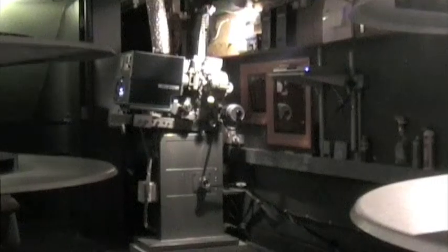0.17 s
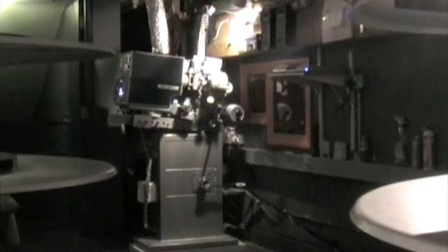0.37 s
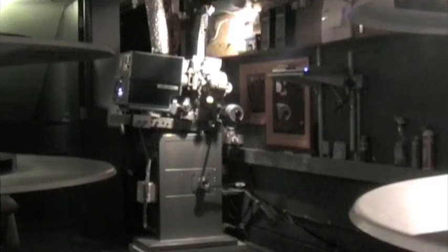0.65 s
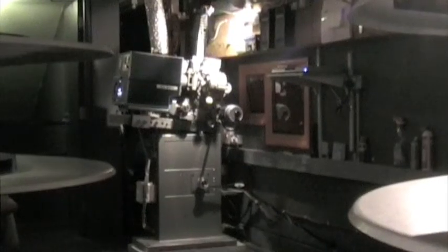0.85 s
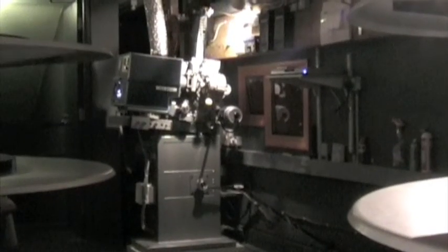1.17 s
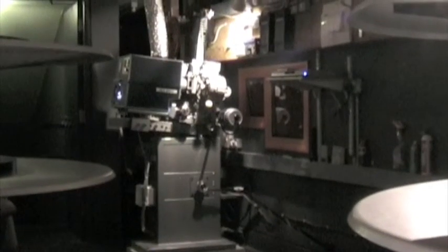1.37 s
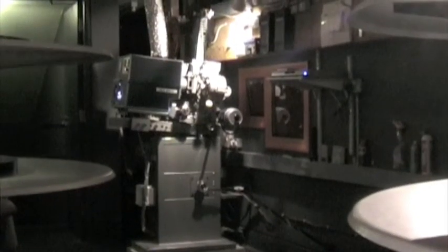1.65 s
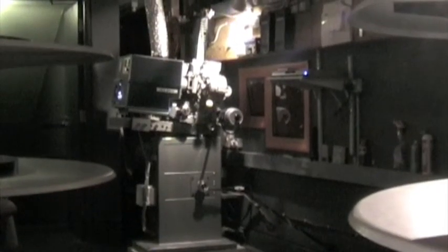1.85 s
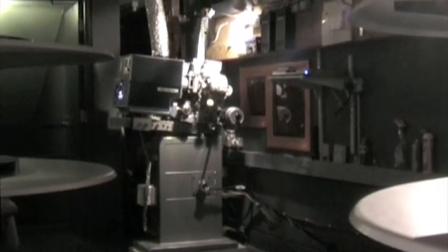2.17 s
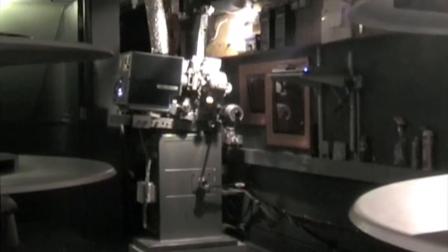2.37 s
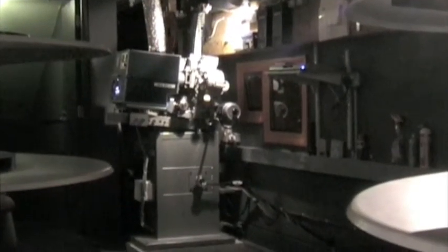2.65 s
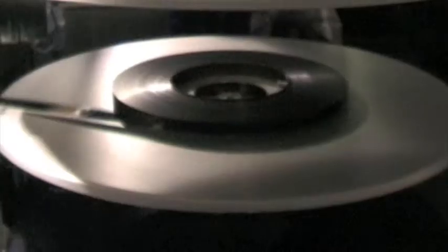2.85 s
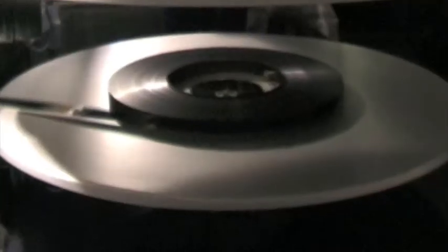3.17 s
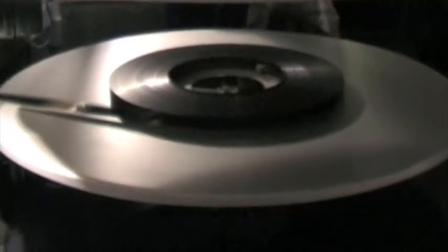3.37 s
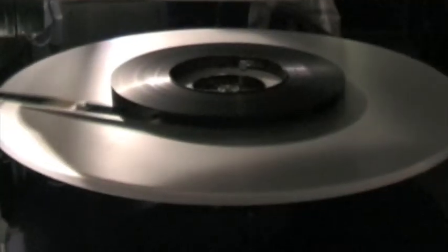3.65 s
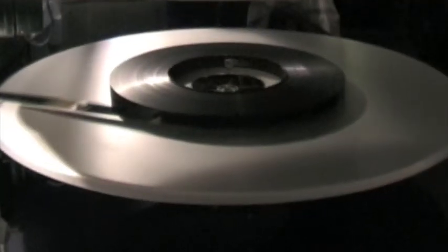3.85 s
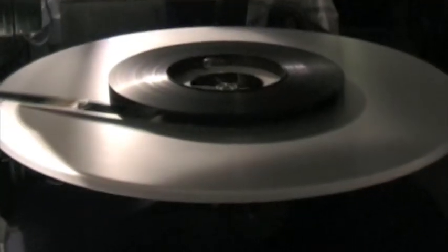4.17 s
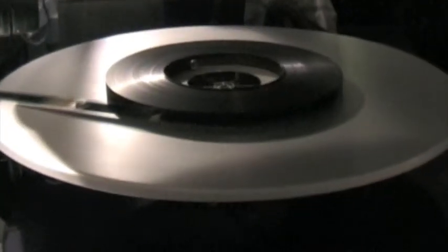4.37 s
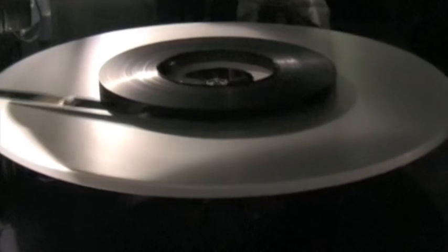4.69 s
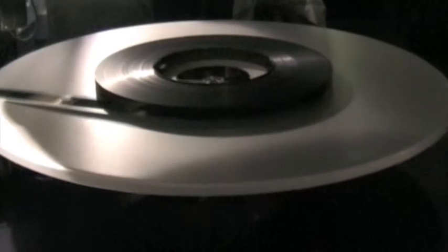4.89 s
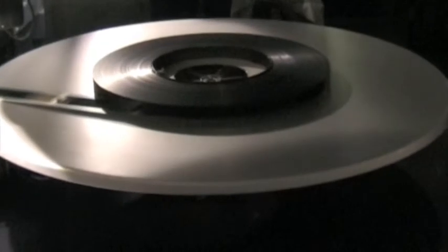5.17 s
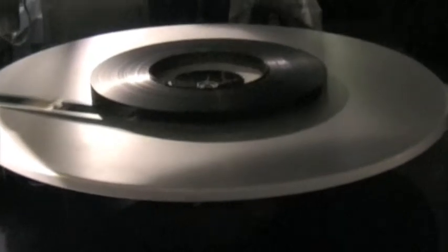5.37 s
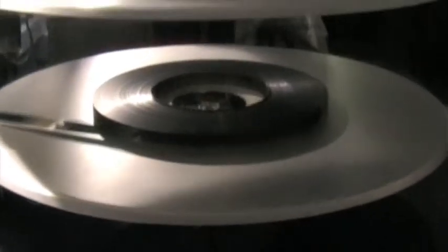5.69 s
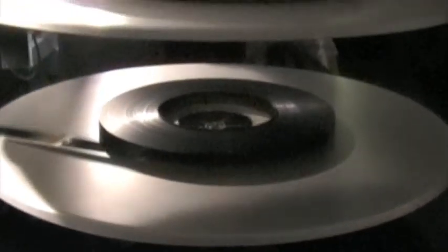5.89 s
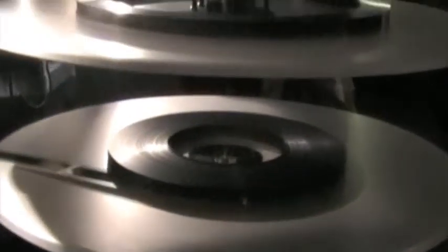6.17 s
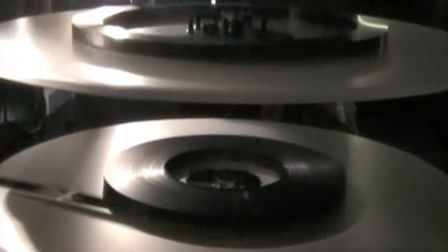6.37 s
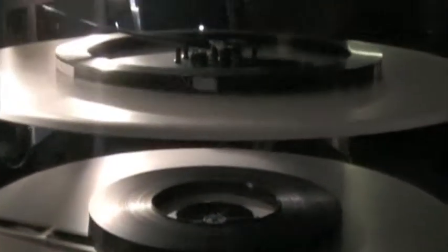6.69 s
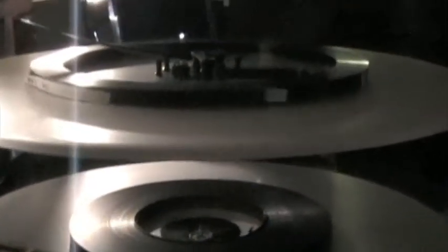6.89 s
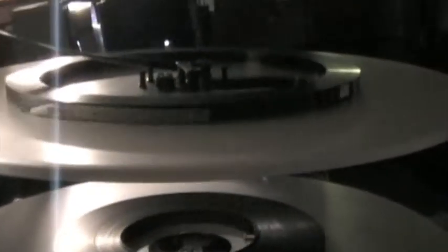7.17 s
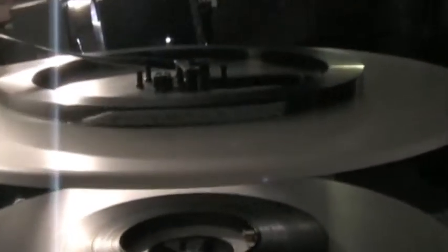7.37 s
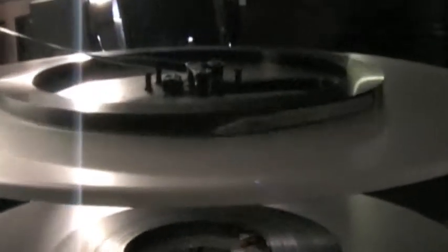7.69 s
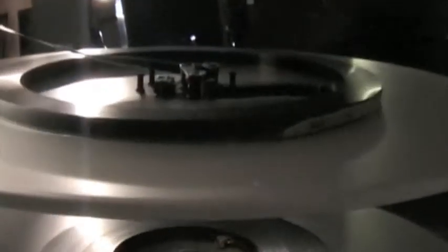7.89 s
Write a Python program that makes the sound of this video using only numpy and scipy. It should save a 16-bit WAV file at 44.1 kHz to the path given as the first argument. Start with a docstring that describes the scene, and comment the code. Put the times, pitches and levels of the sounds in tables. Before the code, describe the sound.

A film projector runs in a small booth, heard from across the room: rapid knocking about twenty-five times a second, blower air, tiny film ticks and a beating motor hum. Near three seconds it dips almost silent for an instant, then returns beside the platters, with more diffuse knocks, sliding-film hiss and thin drive whines. Close stereo microphones.

```python
"""Film projector in a small booth

Heard first across the room and, after a quick dip to near silence, beside the platters. Shaped pulses make
the pull-down's knocks, about 25 a second; coloured noise makes the lamp blower's air and the sliding film,
the perforation ticks and the exhaust duct's drone. Sines make two slowly beating blowers, the mains hum
and the platter drive's passing whines. A hum filter combs the whole sound."""
import sys
import numpy as np
from scipy import signal
from scipy.fft import rfft, irfft, next_fast_len
from scipy.io import wavfile
from scipy.ndimage import uniform_filter1d, map_coordinates

SR = 44100
rng = np.random.default_rng(int(sys.argv[2]) if len(sys.argv) > 2 else 0)


def unload_wav(signal):
    """Save mono or channel-first audio to the path in sys.argv[1] as 16-bit WAV at rate SR, clipped to [-1, 1]."""
    wavfile.write(
        sys.argv[1],
        SR,
        np.round(np.clip(np.atleast_2d(signal).T, -1, 1) * 32767).astype(np.int16),
    )


N = 354123
T = np.arange(N) / SR  # s
SIZE = next_fast_len(N + SR // 2, True)  # room for filter tails
HZ = np.maximum(np.arange(SIZE // 2 + 1) * SR / SIZE, 1)

FRAME_HZ = 24.668
MOVE_S = 2.848  # middle of the fade between the two listening places
SHAFT_HZ, MAINS_HZ = 280.07, 50
SLIP_HZ = 0.4337  # the second blower turns this much slower than the first, so their tones beat

# knocks within one frame (film stops, loop snaps, pin leaves the cross, pin enters it):
# position/share of the frame, level/dB
FRAME_KNOCKS = [(0.01, -0.5), (0.19, -4), (.35, -6), (.88, -3.5)]


def undb(db):
    """Decibels to gain."""
    return 10 ** (np.asarray(db) / 20)


def over_hz(table):
    """Columns of a table, joined by straight lines over log frequency."""
    hz, *columns = np.transpose(table)
    return [np.interp(np.log(HZ), np.log(hz), column) for column in columns]


def shape(x, gain):
    """Filter by a gain for each frequency."""
    return irfft(rfft(x, SIZE) * gain, SIZE)[..., :N]


def resonance(hz, width_hz):
    """Gain of a resonant peak: 1 at its centre, one half at the edges of its width."""
    return 1 / (1 + ((HZ - hz) / width_hz * 2) ** 2)


def colour(x, table):
    """Give a white signal a spectrum in dB per Hz, falling away steeply beyond its ends."""
    lowest, highest = table[0][0], table[-1][0]
    top_rolloff = 1 + (HZ / highest / 1.04) ** 20
    bottom_rolloff = 1 + (lowest / HZ / 2) ** 10
    ends = 1 / np.sqrt(top_rolloff * bottom_rolloff)
    return shape(x / np.std(x), undb(over_hz(table)[0]) * ends * np.sqrt(SR / 2))


def walk(rate):
    """Smooth chance through `rate` random points a second, with a spread of about 1."""
    knots = rng.standard_normal(512)
    return map_coordinates(knots, [T * rate], order=3, mode="wrap")


def tone(hz):
    """A sine of rms 1 that follows a pitch curve from a random phase."""
    return np.sqrt(2) * np.sin(2 * np.pi * (np.cumsum(hz) / SR + rng.random()))


def frame_ring(room_db, rattle_s=0.0042, room_t60=0.33, evenness=0.93):
    """One frame's knocks: each a short rattle of the housing, then the booth's tail."""
    t = T[:SR // 2]
    power = 0
    for share, db in FRAME_KNOCKS:
        age = t - share / FRAME_HZ
        rattle = (age >= 0) * np.exp(-2 * age / rattle_s)
        tail = (age >= 0) * np.exp(-np.log(1e6) * age / room_t60)
        knock = rattle / rattle.sum() + undb(room_db) ** 2 * tail / tail.sum()
        power = power + undb(db) ** 2 * knock
    ring = rfft(rng.standard_normal(len(t)) * np.sqrt(power))
    # many overlapping modes share the energy fairly evenly
    return irfft(ring / np.abs(ring) ** evenness)


def pull_down(across_room, room_db, raw_jitter_s=5.5e-5, scatter_db=1.45, sprocket_db=-0.25):
    """The gate rings the same way on every frame; the sprocket comes round once in four frames."""
    # ring of the film gate and its housing: f/Hz, level/dB per Hz
    gate_spectrum = [(120, -80), (220, -70), (450, -62.5), (1100, -68.5), (1620, -63), (2150, -61),
                     (3200, -64), (4200, -60), (5300, -63.5), (6500, -77.5), (12000, -89), (15000, -104)]
    # sharp resonances of the gate and shutter:
    # f/Hz, width/Hz, lift across the room/dB, lift at the platters/dB
    gate_modes = [(515, 66, 6.5, 4.5), (1556, 13, 8, 11.5), (1594, 30, 9, 9), (1760, 26, 4, -2),
                  (1895, 11, 8, 5), (2493, 13, 7, 9), (3050, 35, 5, 11), (3228, 20, 12, 6),
                  (3408, 24, 8, -5), (4120, 30, 3, 1.5), (4255, 28, 0, 8.5), (5200, 44, 4, -4)]

    frames = np.arange(int((N / SR + 1) * FRAME_HZ))
    timing_chance, size_chance = rng.standard_normal((2, len(frames)))
    # neighbouring frames share their jitter, which also shrinks it
    jitter = raw_jitter_s * uniform_filter1d(timing_chance, size=3)
    at = (frames / FRAME_HZ + jitter) * SR
    size = undb(scatter_db * size_chance + sprocket_db * np.cos(np.pi * frames / 2))
    pulses = np.bincount(np.abs(np.round(at)).astype(int), size, N + SR)
    running = int(20 * SR / FRAME_HZ)  # the machine is already twenty frames into its run
    knocks = signal.fftconvolve(pulses, frame_ring(room_db))[running:running + N]
    peaks = 1
    for hz, width, far_db, near_db in gate_modes:
        lift = undb(far_db if across_room else near_db) - 1
        peaks = peaks + lift * resonance(hz, width)
    return shape(colour(knocks, gate_spectrum), peaks)


def chatter(decay_s):
    """The film shivers after each knock: a power curve of mean 1."""
    power = 0
    for share, db in FRAME_KNOCKS:
        since_knock_s = ((FRAME_HZ * T - share) % 1) / FRAME_HZ
        power = power + undb(db) ** 2 * np.exp(-since_knock_s / decay_s)
    return power / power.mean()


def rush(far, air_chatter=0.054, hiss_chatter=0.17, near_share=0.2, flicker_db=0.65, hiss_flicker_db=1.07):
    """Blower air and sliding film, as two unrelated sounds: the direct one and the booth's diffuse one."""
    # blower and running film: f/Hz, level/dB per Hz
    air_spectrum = [(30, -85), (70, -73), (115, -73), (190, -64), (230, -64), (320, -56), (480, -59.5),
                    (720, -55), (1020, -57), (1350, -55), (2200, -59), (3200, -56.5), (4350, -55.5),
                    (4950, -61.5), (5500, -66), (6800, -80)]
    # hiss of the film in its guides: f/Hz, level/dB per Hz
    hiss_spectrum = [(4000, -105), (6500, -71), (7600, -73.5), (9200, -78.5), (12400, -82.5), (14800, -105)]

    # the shiver is fainter at the platters
    shiver = 1 + (chatter(decay_s=0.005) - 1) * np.where(far, 1, near_share)
    air = colour(rng.standard_normal((2, N)), air_spectrum)
    air = air * np.sqrt(1 + air_chatter * shiver) * undb(flicker_db * walk(14))
    hiss = colour(rng.standard_normal((2, N)), hiss_spectrum)
    hiss = hiss * np.sqrt(1 + hiss_chatter * shiver) * undb(hiss_flicker_db * walk(34))
    return air + hiss


def perforations(per_s=140, scatter_db=3.0, ring_s=0.0017):
    """Perforations flick off the sprocket teeth in small uneven ticks: short bursts of noise."""
    # ticks of the perforations: f/Hz, level/dB per Hz
    tick_spectrum = [(900, -77), (2500, -64), (4300, -68), (5500, -79), (7000, -85), (12500, -92),
                     (14800, -110)]

    sizes = undb(scatter_db * np.minimum(rng.standard_normal(N), 2))
    flicks = (rng.random(N) < per_s / SR) * sizes
    envelope = signal.lfilter([1], [1, -np.exp(-1 / (ring_s * SR))], flicks)
    return colour(envelope * rng.standard_normal(N), tick_spectrum)


def duct(steadiness=0.54):
    """Turbulence drones in duct resonances; its chance swells are partly evened, then it follows a level curve."""
    # duct resonances: f/Hz, width/Hz, level before the swells are evened/dB
    duct_modes = [(146.9, 10.8, -37), (157.3, 19.4, -41)]
    # level curve of the drone: t/s, level/dB
    drone_curve = [(.1, 1), (.55, 0), (.8, 3), (1.05, 0), (1.6, 1), (1.9, 0), (2.25, 2), (2.6, 0), (3, 2),
                   (3.35, -1.5), (3.72, -3), (4.15, 1.5), (4.6, 0.5), (4.9, -2), (5.17, 3), (5.6, -0.5),
                   (6, -1), (6.55, 3.5), (6.8, 0.5), (7.25, -5.5), (7.6, -.5), (8, 1.5)]

    out = 0
    for hz, width, db in duct_modes:
        drone = shape(rng.standard_normal(N), resonance(hz, width))
        out = out + undb(db) * drone / np.std(drone)
    swell = np.sqrt(uniform_filter1d(out ** 2, size=SR // 5)) / np.std(out)
    return out / swell ** steadiness * undb(np.interp(T, *np.transpose(drone_curve)))


def blowers(shaft):
    """Two blowers sing on their second and third shaft orders and beat; airflow makes the tones flutter."""
    # tones at each listening place: shaft order, place, level of the first blower/dB,
    # second blower relative to it/dB, a moment in step/s, flutter/dB
    blower_tones = [(2, "far", -34, -10.5, 0.64, 1), (3, "far", -31.5, -4.5, 0.828, 1),
                    (2, "near", -36, -4, 3.414, -0.5), (3, "near", -33, -9, 3.42, 1.6)]
    # level curve of the two blower tones: t/s, second order/dB, third order/dB
    tone_levels = [(.1, -4, 1.5), (.33, -4, 2), (.6, 0.5, -1.5), (.9, -1, 1), (1.1, -3, -2), (1.27, -1, 5),
                   (1.6, -.5, 2), (1.87, -.5, 4.5), (2.08, 0, -4), (2.3, 0, 0.5), (2.55, -2.5, -5),
                   (2.8, -3, -11), (3.03, 4, -1), (3.36, 0.5, 2), (3.5, 1, -6), (3.75, 0, 3.5),
                   (4.02, -3, -7), (4.2, 0, 1), (4.5, 2, 1.5), (4.7, 0, -0.5), (5.1, -5, 0.5),
                   (5.37, 2, -2), (5.55, -0.5, -1.5), (5.8, 1.5, 1.5), (6, -1, -3), (6.22, 4, 1),
                   (6.43, 2, 0.5), (6.62, -1.5, -5), (6.83, -12, -3), (7, -1.5, 3), (7.4, 10.5, 4),
                   (7.7, 3, 5.5), (8, 0, -0.5)]

    turns = np.cumsum(shaft) / SR + rng.random()
    place = np.where(T < MOVE_S, "far", "near")
    times, *curves_db = np.transpose(tone_levels)
    out = 0
    for order, where, db, second_db, in_step_s, flutter_db in blower_tones:
        slower = turns - SLIP_HZ * (T - in_step_s)
        first = np.sin(2 * np.pi * order * turns)
        second = undb(second_db) * np.sin(2 * np.pi * order * slower)
        level_db = db + np.interp(T, times, curves_db[order - 2]) + flutter_db * walk(22)
        out = out + (place == where) * np.sqrt(2) * undb(level_db) * (first + second)
    return out


def motors(mains_db=-60, wander_hz=0.3):
    """The blower shaft wanders a little; the mains hums and adds side tones around its third order."""
    # side tones, the third order shifted by the mains:
    # multiple of the mains added, level/dB, depth of the beat across the room/dB
    sidebands = [(-2, -39, -1), (2, -40.5, 4), (8, -42, 0), (10, -38.5, 0)]
    beat_peak_s = 0.78

    shaft = SHAFT_HZ + wander_hz * walk(12)
    out = blowers(shaft)
    # across the room their levels move at the beat rate of the two blowers' third orders
    beat = (T < MOVE_S) * np.cos(2 * np.pi * 3 * SLIP_HZ * (T - beat_peak_s))
    for multiple, db, beat_db in sidebands:
        out += undb(db + beat_db * beat) * tone(3 * shaft + multiple * MAINS_HZ)
    hum = tone(np.full(N, 2 * MAINS_HZ))
    return out + undb(mains_db) * hum


def blade_swish(width_hz=24, swish_db=-44):
    """Uneven air at the blades smears the third order into a narrow band of noise."""
    swish = shape(rng.standard_normal(N), resonance(3 * SHAFT_HZ, width_hz))
    return undb(swish_db) * swish / np.std(swish)


def platter(flutter_db=1.6, wobble_hz=2.14):
    """The drive trims its speed and sings, a little unsteadily, while it passes through a resonance."""
    # whines of the drive and its rollers: middle t/s, length/s, start f/Hz, end f/Hz, level at the middle/dB
    whines = [(2.957, .16, 1130, 1130, -33), (3.27, 0.4, 1047, 1064, -33), (3.42, 0.4, 1010, 1024, -32),
              (3.3, .5, 1117, 1123, -34.5), (3.53, 0.28, 1118, 1138, -35), (3.62, .7, 1217, 1243, -26),
              (4.2, .7, 1237, 1241, -33), (4.5, 0.19, 1058, 1076, -35), (4.556, 0.31, 1215, 1230, -31),
              (4.68, 0.23, 1112, 1134, -34.5), (4.774, 0.44, 1221, 1236, -20.2),
              (5.053, 0.38, 1231, 1237, -25.5), (5.85, 1.35, 1238, 1245, -33.5),
              (4.604, 1.63, 3120, 3150, -44), (6.552, 0.77, 1407, 1406, -32.5),
              (7.284, 0.61, 1340, 1350, -31), (7.283, 0.32, 1353, 1366, -35),
              (7.33, .45, 1730, 1720, -34.5), (7.62, .45, 1772, 1770, -37), (7.88, 0.83, 1540, 1555, -34)]

    flutter, wobble = undb(flutter_db * walk(24)), wobble_hz * walk(16)
    out = 0
    for middle, length, start_hz, end_hz, db in whines:
        progress = np.clip((T - middle) / length + 0.5, 0, 1)
        swell = np.sin(np.pi * progress) ** 2
        pitch = start_hz + (end_hz - start_hz) * progress + wobble
        out = out + undb(db) * swell * tone(pitch)
    return out * flutter


def ports(direct, diffuse):
    """Two close microphone ports: the left one lags, and in the treble diffuse sound makes them unlike."""
    # the two ports: f/Hz, left level/dB, right level/dB, left lag/rad, likeness/0-1
    port_table = [(60, -1.5, -8, 1.4, 1), (160, 3.5, -1.2, 1.13, 1), (402, 1.05, -0.45, 0.56, 0.99),
                  (1260, 1.5, 0.5, 0.26, 1), (2680, 1, -0.5, 0.16, 0.95), (4380, 3.5, -2.5, 0.46, 0.99),
                  (5130, 1, -9, 1.47, 1), (6060, 1.5, -2, 2.2, 0.95), (6590, -4, -3.5, 3.2, 1),
                  (7810, -4.5, 3, 2.13, 0.58), (7870, -13, -1.5, 1.6, .3), (8770, -3.5, 2.5, .9, 0.46),
                  (9800, 0, 3, 3.1, 0.47), (11600, -5, 2, 2.8, .1), (14000, -8, 5, 5.7, .15)]

    left_db, right_db, lag, likeness = over_hz(port_table)
    left = shape(direct, undb(left_db))
    right = shape(direct, undb(right_db) * likeness * np.exp(1j * lag))
    right += shape(diffuse, undb(right_db) * np.sqrt(1 - likeness ** 2))
    return np.array([left, right])


def scene(far_knock_db=2, near_knock_db=-0.5):
    """Across the room the gate knocks clearly, facing us; at the platters it comes by way of the walls."""
    # colour across the room, against that at the platters: f/Hz, level/dB
    far_colour = [(65, -3.5), (130, -4), (160, 1.5), (195, 4.5), (260, 0.5), (350, -2.5), (500, 1),
                  (1000, -2), (2500, -1.5), (4200, -0.8), (5300, -3.5), (7000, -0.5), (11500, -4.5),
                  (13000, -4.5)]

    far = T < MOVE_S
    far_knocks = undb(far_knock_db) * pull_down(True, room_db=2.5)
    near_knocks = undb(near_knock_db) * pull_down(False, room_db=10)
    machine = rush(far)
    machine[0] += np.where(far, far_knocks, near_knocks) + perforations() + duct()
    across_room = shape(machine, undb(over_hz(far_colour)[0]))
    direct, diffuse = np.where(far, across_room, machine)
    return ports(direct + motors() + blade_swish() + platter(), diffuse)


def record(dry, memory=0.54, depth=0.95):
    """The hum filter takes out most of what repeats 300 times a second; then the fade and the top cut."""
    half_fade_s, floor_db = 0.074, -33  # length of each half of the fade, what is left at its bottom
    top_hz = 15000

    cycle = np.exp(-2j * np.pi * HZ / 300)  # delay of one repeat
    repeating = (1 - memory) / 2 * (1 + cycle) / (1 - memory * cycle)
    fade = np.minimum(np.hypot(np.abs(T - MOVE_S) / half_fade_s, undb(floor_db)), 1)
    fade = fade * signal.windows.tukey(N, 0.001)  # soft start and end
    sound = shape(dry, 1 - depth * repeating) * fade
    top_cut = signal.ellip(8, 0.2, 70, top_hz, fs=SR, output="sos")
    return signal.sosfilt(top_cut, sound)


dry = scene()
out = record(dry)
unload_wav(out)
```